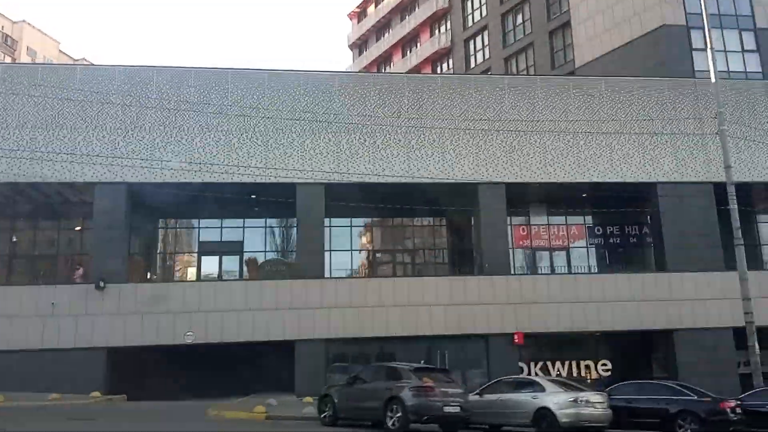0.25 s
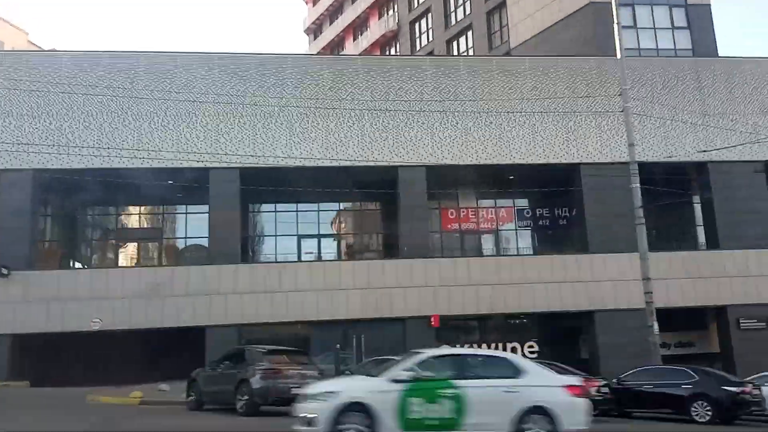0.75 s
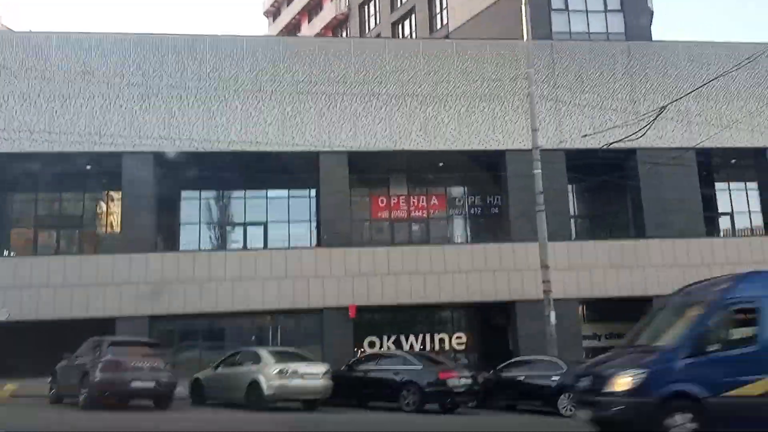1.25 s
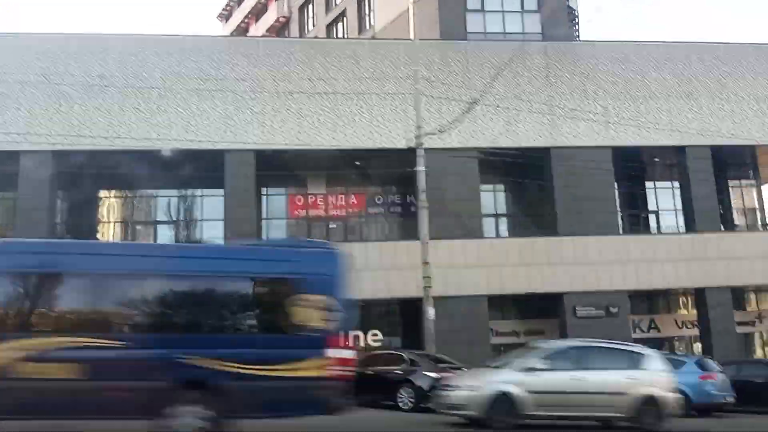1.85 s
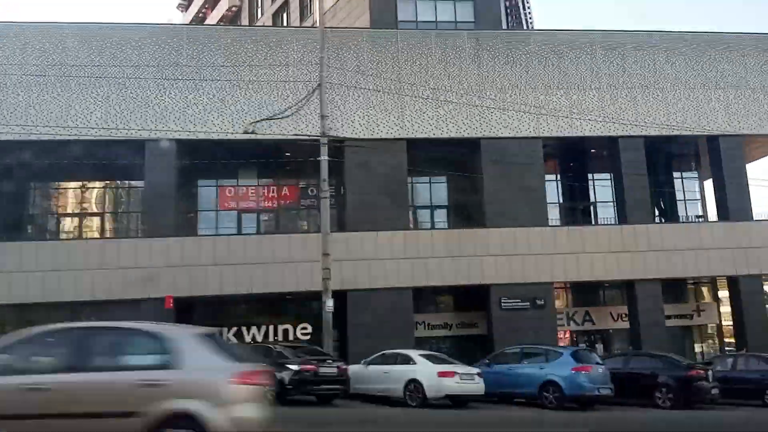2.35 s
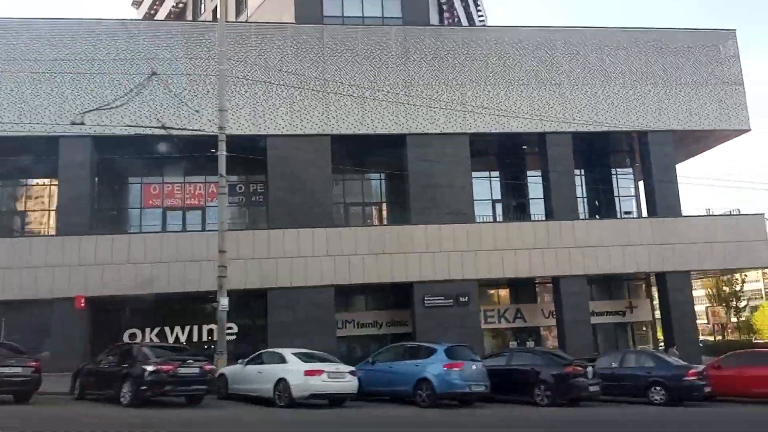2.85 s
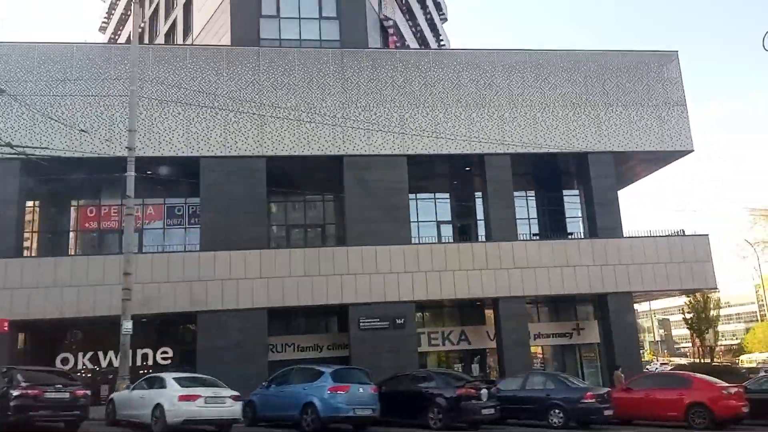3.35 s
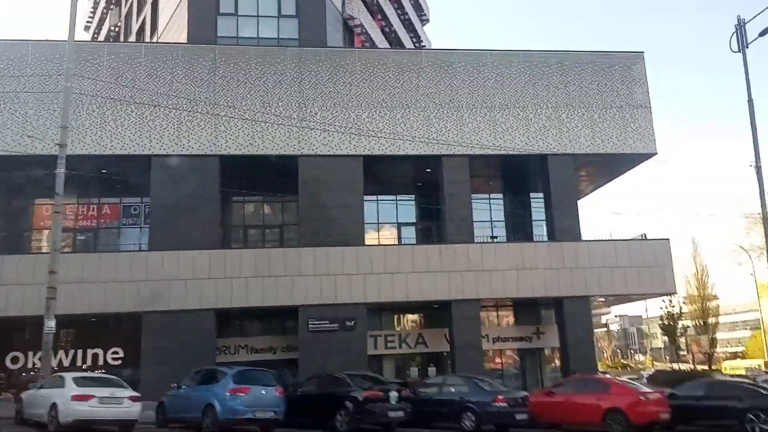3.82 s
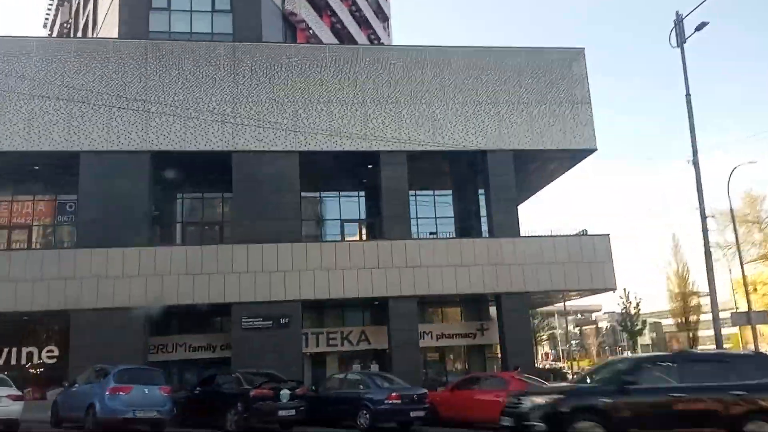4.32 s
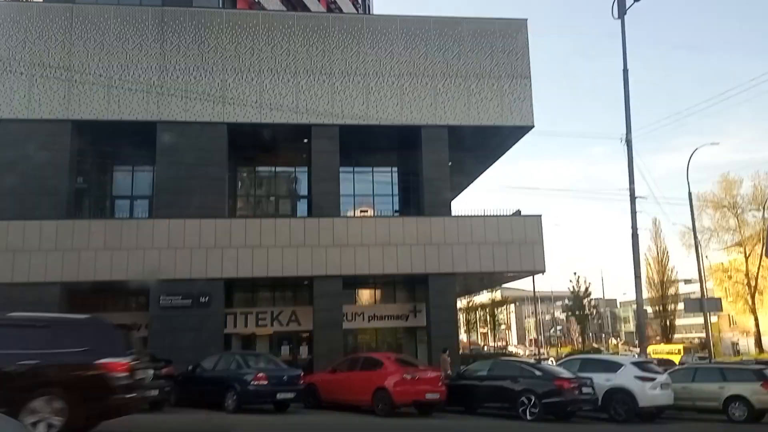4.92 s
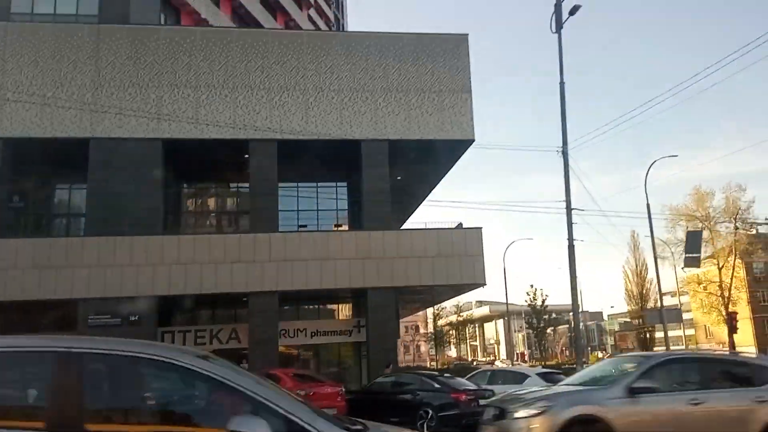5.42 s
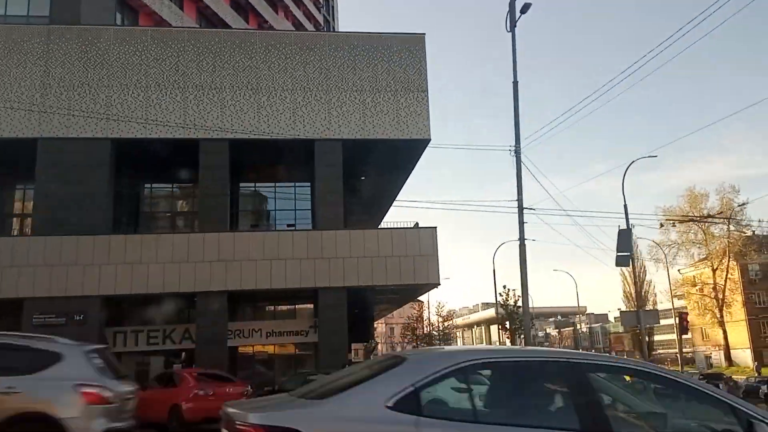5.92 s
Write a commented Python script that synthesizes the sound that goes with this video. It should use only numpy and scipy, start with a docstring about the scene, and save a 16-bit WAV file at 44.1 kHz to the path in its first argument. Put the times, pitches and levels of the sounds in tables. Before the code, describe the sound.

Inside a rolling electric trolleybus, the sound opens mid-ride with a deep boom, low floor rumble and a knock. A wavering low tyre hum swells and dips throughout, with faint hiss and a thin, steady converter whine, slightly weaker from about 1.2 to 2.9 seconds. Soft bumps thud at 0.25, 0.5 and 0.85, with light trim rattle around 0.75. A knock lands at 1.6 and a crisp bright click at 2.05. From 2.2 to 2.75 the heaviest cluster of jolts shakes floor, panels and panes. Dry trim clacks follow near 3.4; a hard double bump hits at 3.75, then a click at 3.95 and tiny metallic tinkles. A softer thump comes at 4.45. Around 5.0 to 5.4 fittings rattle and clack more brightly, then the ride quiets, the whine fading near 5.75, rumble continuing to the end. The cabin echo is very short and muffled.

```python
"""A deep boom, floor rumble and a knock open the ride inside a rolling electric trolleybus.
The road is filtered noise; tyre hum and the faint converter whine are wavering sines.
Bumps swing the floor; knocks, clacks and clicks are decaying noise puffs, taps and tinkles decaying sines.
Trim and fittings rattle as grainy noise; the hits echo briefly in the cabin before the microphone saturates.
"""
import sys
import numpy as np
from scipy import signal
from scipy.fft import rfft, irfft, next_fast_len
from scipy.io import wavfile
from scipy.ndimage import uniform_filter1d, map_coordinates

SR = 44100
rng = np.random.default_rng(int(sys.argv[2]) if len(sys.argv) > 2 else 0)


def put_to_file(sound):
    """Save the sound as 16-bit audio at rate SR, in the file named by the first command-line argument."""
    columns = np.atleast_2d(sound).T  # one column per channel
    safe = np.clip(columns, -1, 1)
    whole_steps = np.round(safe * 32767)
    wavfile.write(sys.argv[1], SR, whole_steps.astype(np.int16))


N = 272097  # length in samples

# Spectral colours of noise, each later scaled to rms 1: frequency_hz, relative_density_db
BOOM_COLOUR = [(15, -52.5), (30, -26.5), (50, -17.5), (70, -8.5), (90, -2), (104, -6), (120, -10.5),
               (145, -38.5)]
RUMBLE_COLOUR = [(70, -45), (100, -9), (120, -2.5), (133, -1.5), (150, -1.5), (172, 1), (190, 1),
                 (230, -15), (300, -27), (500, -93.5)]
PANEL_COLOUR = [(150, -24), (200, 3), (235, 2), (285, 1), (340, -7), (420, -15.5), (520, -21), (700, -48.5),
                (1100, -100)]
BODY_COLOUR = [(240, -32), (400, -1), (480, 2.5), (610, -0.5), (700, -6.5), (1010, -11.5), (1300, -16.5),
               (1670, -20), (2000, -27.5), (2600, -48), (4400, -120)]
TRIM_COLOUR = [(900, -40), (1500, 5), (1750, 5), (2250, -5.5), (2650, -5), (3050, -13), (3400, -21),
               (4300, -20), (6000, -55.5)]
SIZZLE_COLOUR = [(2500, -25), (3500, -1.5), (4200, -5.5), (5000, -11), (5800, -5), (6800, -4), (7700, -8),
                 (9300, -3), (10500, -13), (12000, -21), (13500, -27), (15000, -16.5), (16000, -13)]
HISS_COLOUR = [(900, -31.5), (1400, 8), (2000, -6.5), (3000, -19.5), (5000, -29.5), (7500, -27.5),
               (9400, -22), (11500, -30.5), (13500, -41.5), (15200, -39.5), (16000, -42.5)]
SWELL_COLOUR = [(1200, -31.5), (1900, 2), (2200, 0.5), (2900, -0.5), (3500, -8.5), (4500, -17), (6500, -28)]

# Roughness of the road: time_s, level_db
ROUGHNESS = [(0.0, -22.5), (0.03, -24.5), (0.46, -27), (0.51, -28), (0.6, -24), (2.07, -26.5), (2.43, -20),
             (2.47, -24), (2.57, -21), (2.91, -27.5), (3.72, -26), (3.82, -19.5), (4.07, -26.5), (5.4, -25),
             (5.46, -25.5), (5.76, -28), (5.78, -27.5), (6.16, -31)]
# Level of the deep body boom: time_s, level_db
BOOM_LEVEL = [(0.0, -29), (0.46, -36.5), (0.51, -31), (0.62, -35), (0.96, -25.5), (1.01, -46),
              (1.05, -30.5), (1.42, -35.5), (1.48, -45.5), (1.68, -29), (2.15, -33), (2.29, -24),
              (2.58, -22.5), (2.9, -32.5), (3.5, -30), (3.86, -28), (5.05, -32.5), (5.21, -25),
              (5.53, -39.5), (5.74, -24.5), (5.84, -35.5), (6.17, -33)]
# Swelling of the tyre hum: time_s, level_db
TYRE_HUM_LEVEL = [(0.0, -38), (0.34, -24), (0.38, -38), (0.58, -20), (0.62, -25), (0.91, -32),
                  (0.99, -21.5), (1.22, -31), (1.99, -29.5), (2.09, -22), (2.3, -35), (3.12, -29),
                  (3.16, -21), (3.41, -41), (3.52, -23), (3.62, -45), (3.67, -21.5), (3.77, -59.5),
                  (3.93, -23), (4.26, -34.5), (4.49, -23.5), (4.55, -36), (4.85, -21), (4.92, -44),
                  (4.96, -22.5), (5.85, -44), (5.95, -20.5), (6.04, -33), (6.09, -25), (6.16, -23)]
# Rattling of the interior: time_s, trim_level_db, fittings_sizzle_level_db
RATTLE_LEVEL = [(0, -52, -61), (.1, -56, -68), (.45, -59, -74.5), (.62, -69, -81), (.7, -60, -69),
                (.76, -54, -58), (.84, -55.5, -67), (1.0, -60.5, -68.5), (1.2, -60.5, -76.5),
                (1.57, -63.5, -75.5), (1.62, -58, -68.5), (1.75, -61, -67), (1.9, -59.5, -75),
                (2.2, -58, -69), (2.35, -61, -75.5), (2.56, -55.5, -71.5), (2.85, -55, -74),
                (3.1, -60.5, -78), (3.6, -58, -73.5), (3.76, -55.5, -64.5), (3.85, -56.5, -69.5),
                (4.3, -60.5, -70), (4.5, -65, -73), (4.85, -60.5, -77), (4.97, -60, -69.5),
                (5.1, -55.5, -61.5), (5.25, -55, -67), (5.35, -57, -69.5), (5.55, -64, -72.5),
                (5.7, -64, -82), (5.88, -69.5, -80.5), (6.16, -66, -71.5)]

# Steady converter lines: pitch_hz, level_db, coasting_change_db
CONVERTER_LINES = [(897, -59.5, -1), (1194, -64.5, -0.5), (2403, -75, -8)]
# Passing tones: start_s, end_s, first_pitch_hz, last_pitch_hz, level_db
PASSING_TONES = [(1.25, 2.25, 147, 147, -34), (1.2, 2.1, 613, 590, -53), (2.3, 2.78, 626, 620, -49),
                 (1.95, 2.5, 4500, 4500, -86), (3.08, 3.3, 700, 700, -55), (3.1, 3.3, 866, 866, -58),
                 (4.3, 4.95, 585, 576, -56.5)]

# Knocks in the body, before its modes ring: start_s, level_db, pitch_hz, body_shudder_db, pane_shudder_db
KNOCKS = [(0.0, -48, 507, -44, -46), (0.213, -41.5, 527, -45, -62), (0.311, -41, 560, -38.5, -50),
          (0.472, -30, 750, -33, -50), (0.509, -29, 610, -62, -62), (0.874, -43.5, 622, -38.5, -61),
          (1.09, -32.5, 465, -46.5, -61), (1.62, -29.5, 470, -62, -66.5), (1.891, -45, 575, -32.5, -60),
          (2.216, -26, 495, -36, -51), (2.261, -30, 600, -35.5, -60), (2.335, -45, 897, -36.5, -36.5),
          (2.388, -27.5, 500, -42, -44.5), (2.517, -32, 770, -36.5, -47), (2.56, -31.5, 639, -44, -48),
          (2.616, -28, 478, -46.5, -60), (2.684, -30, 630, -44, -55), (2.733, -37.5, 823, -44, -47),
          (3.153, -60.5, 700, -49, -64), (3.741, -20.5, 392, -35.5, -36), (3.78, -23.5, 470, -48, -76),
          (3.938, -36, 520, -45, -59), (4.107, -30, 470, -57, -55), (4.35, -38, 500, -52.5, -49),
          (4.494, -47.5, 500, -51.5, -56.5), (4.841, -48, 560, -39, -58.5), (5.154, -33, 610, -37, -49),
          (5.578, -43.5, 557, -65, -55), (5.72, -44.5, 550, -33.5, -44), (5.997, -45, 498, -56.5, -68.5)]
# Fittings that chime on one mode: start_s, pitch_hz, level_db, held_s
TINKS = [(0.008, 3980, -57, 0.0087), (0.052, 6710, -56, 0.014), (0.134, 6350, -60, 0.0064),
         (0.219, 10400, -64, .01), (0.308, 4510, -60, 0.0053), (0.785, 4290, -56, 0.0062),
         (0.81, 9300, -69, 0.0067), (0.837, 4100, -63, .009), (0.885, 9540, -62, 0.011),
         (0.903, 4030, -59, 0.0072), (0.951, 5970, -66.5, 0.028), (0.865, 6840, -62, 0.014),
         (1.03, 6340, -71, 0.015), (1.08, 3980, -71, 0.015), (1.116, 6600, -61.5, 0.0056),
         (1.19, 4330, -67, 0.029), (1.601, 3710, -59, 0.0082), (1.656, 5590, -57, 0.0065),
         (2.66, 5900, -61, 0.0089), (3.306, 9300, -58.5, 0.019), (3.36, 6070, -64, 0.0083),
         (3.391, 3670, -63, 0.023), (3.428, 4140, -62, .008), (3.6, 5730, -53, 0.0048),
         (3.648, 4050, -60.5, 0.013), (3.678, 5880, -66, 0.029), (3.865, 6000, -60, 0.0068),
         (3.922, 4020, -63, 0.012), (4.153, 4230, -60, .008), (4.177, 6830, -60.5, 0.014),
         (4.196, 9050, -60, 0.01), (4.229, 4040, -57, .007), (4.262, 5740, -54, 0.0044),
         (4.39, 6600, -64, 0.012), (4.41, 6100, -65.5, 0.017), (4.455, 6750, -63.5, .015),
         (4.47, 8700, -66.5, 0.018), (4.61, 4130, -68, 0.014), (4.965, 4150, -56.5, 0.0049),
         (4.967, 8840, -61, 0.01), (5.047, 6560, -75, 0.033), (5.058, 5950, -58, .004),
         (5.095, 3990, -56, 0.006), (5.119, 6860, -62, 0.017), (5.139, 9350, -58, 0.0088),
         (5.246, 3520, -58.5, 0.013), (5.276, 4230, -60, 0.0073), (5.324, 3500, -58.5, 0.0028)]
# Broad clicks: start_s, level_db, lower_share_db, top_octave_share_db
CLICKS = [(0.024, -56, 8, -16.5), (0.131, -54.5, 6, -30), (0.216, -46.5, -12, -20),
          (0.311, -55.5, 7, -13.5), (0.437, -53, -7.5, -25.5), (0.484, -46, -3, -20.5),
          (0.646, -52, 2.5, -3.5), (0.705, -53.5, -6, -17), (0.739, -49, 4, -10.5), (0.7857, -55, 5, -17.5),
          (0.9945, -53.5, 9, -13), (1.5911, -49, -1, -18.5), (1.622, -55.5, 0, -17),
          (1.7432, -56.5, -3, -27), (2.053, -35, -3.5, -7), (2.069, -38, -8, -8), (2.727, -50.5, -3, -19),
          (3.049, -55, 6, -16), (3.7543, -52, 7, -12), (3.841, -58.5, 7, -8), (3.945, -38.5, 7.5, -8),
          (3.961, -43, -5, -10.5), (4.033, -54.5, -16, -9.5), (4.3855, -55.5, 6.5, -16.5),
          (4.9554, -51.5, -13, -18.5), (5.0244, -57, 3.5, -4.5), (5.058, -47.5, 2.5, -6),
          (5.094, -58.5, 9, -14), (5.242, -62, 1, -15.5), (5.584, -54.5, -1, -9.5), (5.704, -66, 8, -14),
          (5.944, -56, 3, -10), (6.043, -50, -3, -13), (6.119, -51, 0.5, -26)]
# Wheels over bumps: start_s, level_db, pitch_hz
THUMPS = [(0.254, -18.5, 142), (0.506, -16, 98.2), (0.861, -16.5, 142), (2.217, -19.5, 121),
          (2.337, -15, 113), (2.378, -12, 155), (2.425, -12, 118.6), (2.542, -16, 102.6),
          (2.581, -11.5, 107.6), (2.661, -20.5, 124.5), (3.728, -17, 123.4), (3.737, -19, 268.4),
          (3.798, -11, 157), (4.449, -17.5, 104.4)]
# Short ringing taps in body and panes, many at knock onsets: start_s, level_db, pitch_hz
TAPS = [(0.49, -44, 777), (0.52, -39, 620), (0.611, -41, 624), (0.875, -30, 623), (1.1, -36.5, 746),
        (2.222, -39, 910), (2.272, -34.5, 750), (2.338, -33.5, 905), (2.366, -33, 934), (2.393, -32, 770),
        (2.419, -35, 914), (2.518, -34, 900), (2.535, -32, 655), (2.563, -34.5, 935), (2.685, -34.5, 623),
        (2.734, -34.5, 860), (2.765, -48, 930), (3.742, -20, 366), (3.745, -33, 880), (3.79, -22, 298),
        (3.8, -31, 470), (3.846, -31, 566), (3.865, -32, 597), (3.939, -38.5, 601), (4.108, -32.5, 632),
        (4.497, -39.5, 602), (3.783, -30, 652), (4.845, -38, 582), (5.58, -38.5, 600), (6.0, -44.5, 630)]
# Tiny high ticks, mostly on loud bass peaks: start_s, level_db
HIGH_TICKS = [(0.5372, -54.5), (0.898, -59), (2.2778, -46), (2.378, -48.5), (2.417, -53.5), (2.5362, -62),
              (2.597, -47.5), (3.736, -59), (3.798, -48.5)]
# Clacks of the trim, before its modes ring: start_s, level_db, pitch_hz
CLACKS = [(0.648, -48.5, 2350), (0.7328, -43.5, 2150), (1.6033, -49.5, 2600), (1.6545, -43.5, 2260),
          (2.2177, -41.5, 2240), (2.2717, -44, 2590), (2.338, -41.5, 2740), (2.363, -53.5, 2940),
          (2.4143, -45.5, 2250), (2.5182, -39.5, 2240), (2.605, -54, 2620), (2.7362, -44, 2690),
          (2.7801, -48, 2400), (2.8595, -49, 2620), (3.045, -45, 2610), (3.303, -45, 2380),
          (3.381, -37, 2550), (3.398, -37, 2880), (3.415, -46.5, 2300), (3.62, -40.5, 2440),
          (3.7455, -41, 2480), (3.7683, -44, 2290), (3.8445, -43, 3040), (3.922, -37.5, 2280),
          (3.9524, -39, 3110), (3.996, -43, 2470), (4.1535, -48, 2670), (4.2186, -50.5, 2580),
          (4.3226, -41.5, 2300), (4.3804, -46.5, 2550), (4.4747, -52, 2190), (5.025, -48, 2870),
          (5.0579, -45, 2610), (5.1042, -41, 2180), (5.1683, -38, 2750), (5.248, -36.5, 2220),
          (5.2804, -43, 2230), (5.3216, -41, 2580), (5.3996, -38, 2220), (5.469, -41.5, 2170),
          (5.5516, -41, 2370), (5.6805, -50, 2390), (5.735, -44, 1800), (5.755, -51.5, 2600)]
# Smooth swells of hiss: centre_s, half_length_s, level_db
SWELLS = [(0.774, .06, -58.5), (2.39, .06, -63.5), (2.55, 0.02, -59), (3.77, 0.038, -53), (5.1, 0.075, -66),
          (5.255, 0.091, -56), (5.507, 0.089, -62.5)]
# Thin bright snaps: start_s, relative_level_db
SNAPS = [(4.152, -57.5), (4.516, -60), (4.737, -58.5), (4.797, -62.5), (4.876, -43.5), (5.828, -44)]

# Modes of the small metal parts, before random detuning: pitch_hz, relative_level_db
FITTING_MODES = [(3750, -6), (4150, 4), (4550, -1), (5750, 2.5), (6300, -9), (6750, -0.5), (8200, -6),
                 (8900, -3.5), (9400, -1), (9900, -11), (10500, -8), (11400, -19)]
# Modes of window panes, body and trim: centre_hz, width_hz, level_db
PANE_MODES = [(720, 310, -7), (928, 73, 11.5)]
BODY_MODES = [(466, 12, -8.5), (637, 34, -1), (800, 38, -2.5), (910, 33, 0.5)]
TRIM_MODES = [(1690, 87, -1), (2155, 70, 4), (2610, 80, 1.5), (3050, 100, 3)]

TYRE_HZ = 208.6  # mean pitch of the air ring inside the tyres
FLOOR_DB = -1.5  # floor rumble over the road's roughness
# Level on an average road, and dB of change per dB of roughness
PANEL_DB, PANEL_FOLLOWS = -30.5, 0.43
BODY_DB, BODY_FOLLOWS = -46.5, 0.5
PANE_DB = -55  # follows the road as the body does
PANEL_SHUDDER_DB = 1.5  # panels over the body's shudder
SHUDDER_RISE_S, SHUDDER_T60_S = 0.016, 0.16
COASTING_START_S, COASTING_END_S, WHINE_ENDS_S = 1.15, 2.95, 5.76
# Unsteadiness of the tones: phase_rad, phase_rad, level_db
WHINE_WAVER, PASSING_WAVER, WHINE_DRIFT_DB = 0.15, 0.4, 1.2
SCRAPE_S = 0.005  # a click scrapes this long before its fast decay
SEATS_HZ = 5000  # seats swallow the echo above this
BASS_CUT_HZ, TOP_HZ = 24.2, 15830  # band limits of the microphone
TOP_AMPLITUDE = 0.42  # where the microphone stage saturates


def amp(db):
    """Level to amplitude: 20 dB is a factor of ten."""
    return 10 ** (np.asarray(db) / 20)


def unit(x):
    """Normalisation to unit rms."""
    return x / np.sqrt(np.mean(x ** 2) + 1e-20)


def curves(rows):
    """Linear interpolation: one value per sample for each column after the time."""
    s, *columns = np.transpose(rows)
    return [np.interp(np.arange(N) / SR, s, column) for column in columns]


def wobble(rate):
    """Slow random modulation: a smooth curve through rate random knots a second."""
    knots = rng.standard_normal(int(N * rate / SR) + 4)
    return map_coordinates(knots, [np.arange(N) * rate / SR])


def filtered(x, response):
    """Linear filtering: the spectrum times a response of frequency."""
    m = next_fast_len(N + SR // 2)
    return irfft(rfft(x, m) * response(np.fft.rfftfreq(m, 1 / SR)), m)[:N]


def coloured(x, points):
    """Spectral shaping through points on a log-frequency axis, at rms 1."""
    f, db = np.transpose(points)
    return unit(filtered(x, lambda hz: amp(np.interp(np.log(hz + 1), np.log(f), db, -120, -120))))


def resonance(centre_hz, width_hz):
    """Damped harmonic oscillator: unit response at its centre, falling off over its width."""
    return lambda f: 1j * f * width_hz / (centre_hz ** 2 - f ** 2 + 1j * f * width_hz)


def modes(table):
    """Modal superposition: resonances summed with alternating sign."""
    def response(f):
        return sum((-1) ** k * amp(db) * resonance(hz, width)(f) for k, (hz, width, db) in enumerate(table))
    return response


def grainy(rate, spread_db, life, bed):
    """Shot noise: puffs at random moments (rate a second) and sizes over a smooth bed."""
    hits = (rng.random(N) < rate / SR) * amp(spread_db * rng.standard_normal(N))
    t = np.arange(SR // 10) / SR
    puff = np.exp(-t / life) * (1 - np.exp(-t / (0.3 * life)))
    envelope = bed + unit(signal.fftconvolve(hits, puff)[:N])
    return envelope * rng.standard_normal(N)


def patchy(x, depth_db):
    """Time-frequency modulation: random gain in smooth patches of the spectrogram."""
    z = signal.stft(x, nperseg=256)[2]
    field = uniform_filter1d(rng.standard_normal(z.shape), 4, 0)
    field = uniform_filter1d(field, 9, 1)
    return signal.istft(z * amp(depth_db * unit(field)), nperseg=256)[1][:N]


def add(track, s, sound):
    """Superposition: sound joins the track at s seconds."""
    start = round(max(s, 0) * SR)
    track[start:start + len(sound)] += sound[:N - start]


def shaken_gain(mean_db, follows, shudder_db):
    """Forced vibration: gain follows the road, and each knock adds a decaying shudder of its own level."""
    rough_db, = curves(ROUGHNESS)
    gain = amp(mean_db + follows * (rough_db - rough_db.mean()))
    t = np.arange(SR // 2) / SR
    for (s, *_), db in zip(KNOCKS, shudder_db):
        add(gain, s, amp(db - 60 * t / SHUDDER_T60_S) * np.clip(t / SHUDDER_RISE_S, 0, 1))
    return gain


def road():
    """Broadband excitation: rough asphalt drums floor and panels and rings the air in the tyres."""
    boom_gain = amp(curves(BOOM_LEVEL)[0] + 0.32 * wobble(7))
    boom = boom_gain * coloured(rng.standard_normal(N), BOOM_COLOUR)
    rumble_gain = amp(curves(ROUGHNESS)[0] + FLOOR_DB + 0.27 * wobble(4.8))
    rumble = rumble_gain * coloured(rng.standard_normal(N), RUMBLE_COLOUR)
    pitch = TYRE_HZ + 2.49 * wobble(14)  # the ring wavers as the tread deforms
    tyre_gain = np.sqrt(2) * amp(curves(TYRE_HUM_LEVEL)[0] + 0.32 * wobble(18))
    tyre = tyre_gain * np.sin(2 * np.pi * np.cumsum(pitch) / SR)
    panel_gain = shaken_gain(PANEL_DB, PANEL_FOLLOWS, np.transpose(KNOCKS)[-2] + PANEL_SHUDDER_DB)
    panels = panel_gain * coloured(rng.standard_normal(N), PANEL_COLOUR)
    return boom + rumble + tyre + panels


def interior():
    """Repeated impact: body, panes, trim and fittings chatter as grainy noise over a steady air hiss."""
    trim_db, sizzle_db = curves(RATTLE_LEVEL)
    *_, body_db, pane_db = np.transpose(KNOCKS)
    jolts = grainy(37, 2.2, 0.0066, bed=6.5)  # shared by body and panes
    body = shaken_gain(BODY_DB, BODY_FOLLOWS, body_db) * coloured(jolts, BODY_COLOUR)
    buzz = unit(filtered(jolts, lambda f: modes(PANE_MODES)(f) * resonance(850, 500)(f)))
    panes = shaken_gain(PANE_DB, BODY_FOLLOWS, pane_db) * buzz
    trim_grains = patchy(grainy(70, 0.72, 0.012, bed=0.66), depth_db=2)
    trim = amp(trim_db) * coloured(trim_grains, TRIM_COLOUR)
    sizzle_grains = patchy(grainy(72, 2.5, 0.0035, bed=0.85), depth_db=4)
    sizzle = amp(sizzle_db) * coloured(sizzle_grains, SIZZLE_COLOUR)
    hiss = amp(-70.5) * coloured(rng.standard_normal(N), HISS_COLOUR)
    return body + panes + trim + sizzle + hiss


def tone(hz, db, waver):
    """Amplitude and phase modulation: a sine that wavers and drifts in level."""
    unsteady_db = db + 8.7 * waver * wobble(16) + WHINE_DRIFT_DB * wobble(3.4)
    phase = 2 * np.pi * np.cumsum(np.broadcast_to(hz, N)) / SR + waver * wobble(12)
    return np.sqrt(2) * amp(unsteady_db) * np.sin(phase)


def fade(start_s, end_s):
    """Linear gating: a ramp up after the start and down to the end."""
    t = np.arange(N) / SR
    return np.clip(np.minimum(t - start_s, end_s - t) / 0.075, 0, 1)


def converter():
    """Line spectrum: nearly steady tones, thinner while coasting."""
    t = np.arange(N) / SR
    coasting = np.clip(np.minimum(t - COASTING_START_S, COASTING_END_S - t) / 0.3, 0, 1)
    whine = sum(tone(hz, db + dip_db * coasting, WHINE_WAVER) for hz, db, dip_db in CONVERTER_LINES)
    return fade(-0.3, WHINE_ENDS_S) * whine  # already sounding at the start


def blows(table, width, attack, t60):
    """Impulse excitation: each dying noise puff passes a broad resonance of the struck panel."""
    out, t = np.zeros(N), np.arange(SR // 2) / SR
    f = np.fft.rfftfreq(len(t), 1 / SR)
    envelope = amp(-60 * t / t60) * (1 - np.exp(-(t / attack) ** 2))
    for s, db, hz, *_ in table:
        puff = rng.standard_normal(len(t)) * envelope
        ring = irfft(rfft(puff) * resonance(hz, width * hz)(f) ** 2, len(t))
        add(out, s - attack / 2, amp(db) * ring / np.abs(ring).max())
    return out


def knocks():
    """Modal excitation: blows are heard directly and through the body's own modes."""
    direct = blows(KNOCKS, width=0.38, attack=0.005, t60=0.31)
    return 0.44 * direct + filtered(direct, modes(BODY_MODES))


def tinkle():
    """Free vibration: small metal parts chime roughly; faint ones fall by chance, louder in strong shaking."""
    shake_db = curves(RATTLE_LEVEL)[-1]
    faint = []
    for when, which, detune, size, rub in rng.random((600, 5)):
        hz, db = FITTING_MODES[int(which * len(FITTING_MODES))]
        level_db = db + shake_db[int(when * N)] - 7.5 + 6 * size
        faint.append((when * N / SR, hz * (0.97 + 0.13 * detune), level_db, 0.033 * rub))
    out, t = np.zeros(N), np.arange(SR // 10) / SR
    for s, hz, db, length in list(TINKS) + faint:
        held = np.clip(t / 0.0046, 0, 1) * amp(-60 * np.clip(t - length, 0, 1) / 0.043)  # rubs, then dies
        rough = np.interp(t, np.arange(40) * 0.003, rng.standard_normal(40))
        add(out, s, amp(db + 4.1 * rough) * held * np.sin(2 * np.pi * hz * t + 0.73 * rough[::-1]))
    return out


def clicks():
    """Stick and release: hard parts scrape together in a bright noise puff of its own colour."""
    out, t = np.zeros(N), np.arange(SR // 4) / SR
    f = np.fft.rfftfreq(len(t), 1 / SR)
    decay = amp(-60 * np.clip(t - SCRAPE_S, 0, 1) / 0.084 - 150 * t)
    envelope = decay * (1 - np.exp(-t / 0.0048))
    low, middle, top = (resonance(hz, w)(f) ** 2 for hz, w in [(5900, 2500), (9300, 2600), (14800, 3600)])
    for s, db, low_db, top_db in CLICKS:
        colour = amp(low_db) * low + middle + amp(top_db) * top
        puff = envelope * rng.standard_normal(len(t))
        add(out, s - 0.0018, amp(db) * irfft(rfft(puff) * colour, len(t)))
    return out


def bumps(attack, t60):
    """Damped oscillation: a bump sets the floor swinging on one low mode, a little unsteadily."""
    out, t = np.zeros(N), np.arange(SR // 2) / SR
    for s, db, hz in THUMPS:
        sway = np.interp(t, np.arange(30) * 0.02, rng.uniform(-2, 1, size=30))
        envelope = amp(db - 60 * t / t60) * (1 - np.exp(-t / attack))
        add(out, s - attack, envelope * np.sin(2 * np.pi * hz * t + 0.81 * sway))
    return out


def taps(attack, t60):
    """Damped ringing: each tap rings at one pitch of its own, roughened by a random phase."""
    out, t = np.zeros(N), np.arange(SR // 4) / SR
    for s, db, hz in TAPS:
        sway = np.interp(t, np.arange(30) * 0.0079, rng.standard_normal(30))
        envelope = amp(db - 60 * t / t60) * (1 - np.exp(-t / attack))
        add(out, s - attack, envelope * np.sin(2 * np.pi * hz * t + 0.66 * sway))
    return out


def high_ticks():
    """Short decaying sine: a tick is a very brief 12 kHz burst."""
    out, t = np.zeros(N), np.arange(SR // 4) / SR
    for s, db in HIGH_TICKS:
        envelope = amp(db - 60 * t / 0.0033) * (1 - np.exp(-t / 0.0002))
        add(out, s, envelope * np.sin(2 * np.pi * 12100 * t))
    return out


def clacks():
    """Modal excitation: blows are heard directly and through the trim's own modes."""
    direct = blows(CLACKS, width=0.48, attack=0.008, t60=0.062)
    return 0.26 * direct + filtered(direct, modes(TRIM_MODES))


def swells():
    """Gaussian amplitude modulation: dense hiss rises and falls smoothly."""
    t = np.arange(N) / SR
    envelope = sum(amp(db) * np.exp(-((t - s) / half) ** 2) for s, half, db in SWELLS)
    return envelope * coloured(patchy(rng.standard_normal(N), depth_db=5.5), SWELL_COLOUR)


def passing_tones():
    """Frequency glide: unsteady tones fade in and out, some sliding in pitch."""
    t = np.arange(N) / SR
    out = np.zeros(N)
    for start, end, first_hz, last_hz, db in PASSING_TONES:
        pitch = np.interp(t, [start, end], [first_hz, last_hz])
        out += fade(start, end) * tone(pitch, db, PASSING_WAVER)
    return out


def snaps():
    """Short impulse, wide spectrum: a thin noise puff through high resonances."""
    out, t = np.zeros(N), np.arange(SR // 4) / SR
    f = np.fft.rfftfreq(len(t), 1 / SR)
    bright = resonance(10000, 5000)(f) ** 2
    bright = bright + amp(-8.5) * resonance(14800, 3600)(f) ** 2 + amp(-9.5) * resonance(5500, 3000)(f)
    for s, db in SNAPS:
        puff = amp(-60 * t / 0.014) * (1 - np.exp(-t / 0.0007)) * rng.standard_normal(len(t))
        add(out, s - 0.0012, amp(db + 6.0) * irfft(rfft(puff) * bright, len(t)))
    return out


def cabin(x, t60):
    """Reverberation: a short dense echo off seats and glass, its treble absorbed by the seats."""
    t = np.arange(SR // 3) / SR
    tail = rng.standard_normal(len(t)) * amp(-60 * t / t60) * (t > 0.004)
    echo = signal.fftconvolve(x, tail / np.linalg.norm(tail))[:N]
    return amp(-8.0) * filtered(echo, lambda hz: 1 / (1 + 1j * hz / SEATS_HZ))


def scene():
    """Superposition: continuous sounds reach the microphone directly, hits also by the cabin echo."""
    ride = road() + interior() + converter() + passing_tones() + swells()
    thumps = bumps(attack=0.00919, t60=0.43)
    hits = knocks() + tinkle() + clicks() + taps(attack=0.001, t60=0.088) + high_ticks() + clacks() + snaps()
    return (ride + thumps + hits + cabin(hits, t60=0.076))[None]


def record(dry):
    """Saturation and band limiting: the microphone rounds off peaks, thins the bass and cuts the top."""
    soft = dry[0] / (1 + np.abs(dry[0] / TOP_AMPLITUDE) ** 4) ** (1 / 4)
    return filtered(soft, lambda hz: (hz < TOP_HZ) * hz ** 2 / (hz ** 2 + BASS_CUT_HZ ** 2))[None]


dry = scene()
out = record(dry)
put_to_file(out)
```